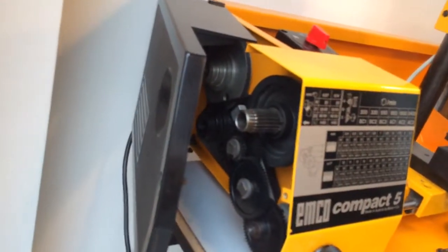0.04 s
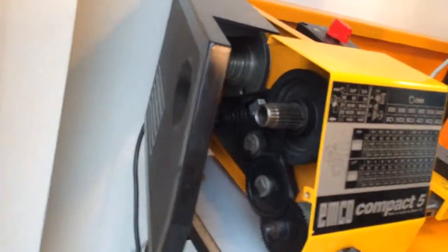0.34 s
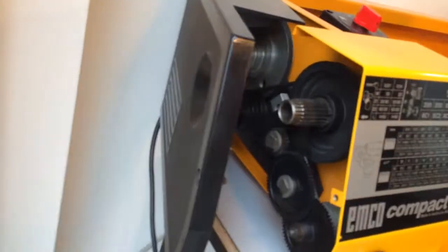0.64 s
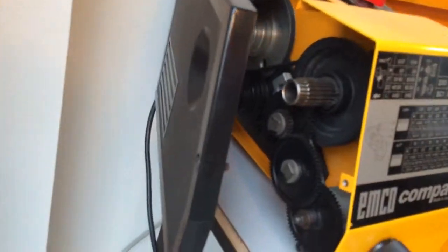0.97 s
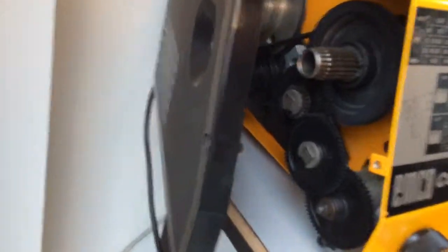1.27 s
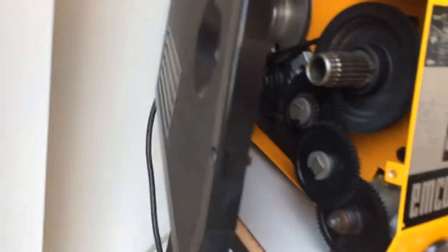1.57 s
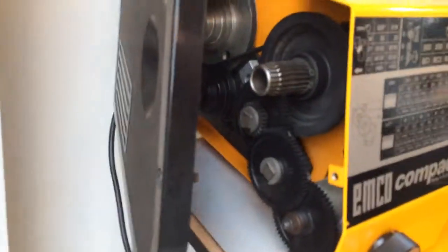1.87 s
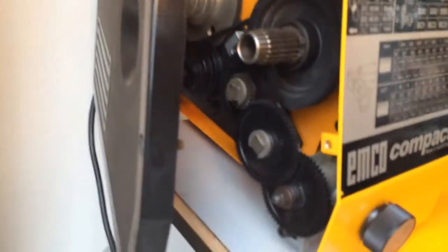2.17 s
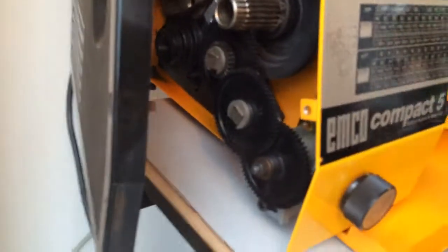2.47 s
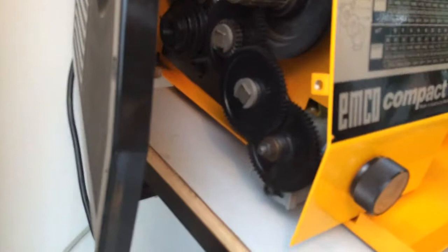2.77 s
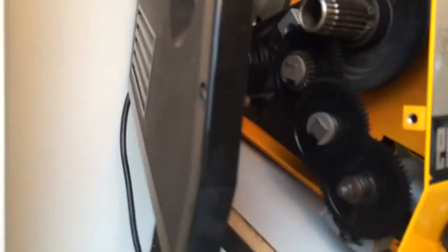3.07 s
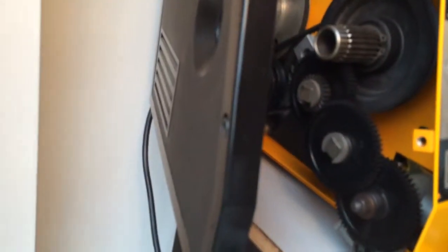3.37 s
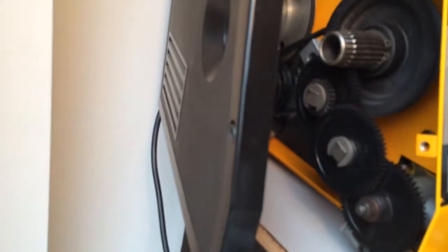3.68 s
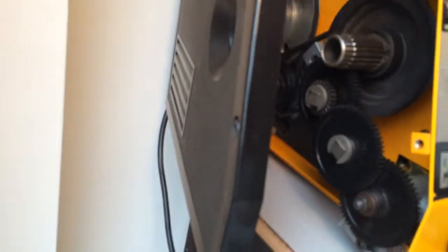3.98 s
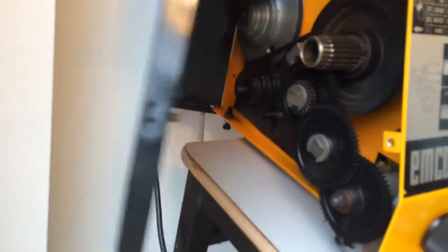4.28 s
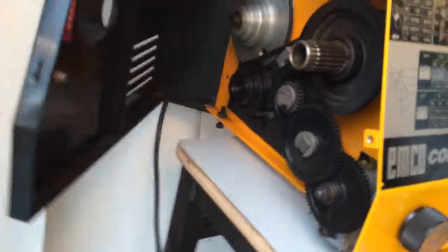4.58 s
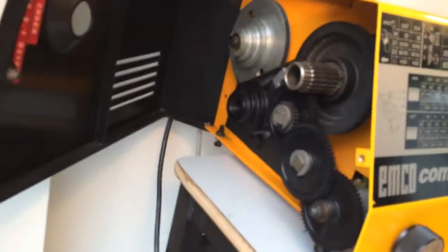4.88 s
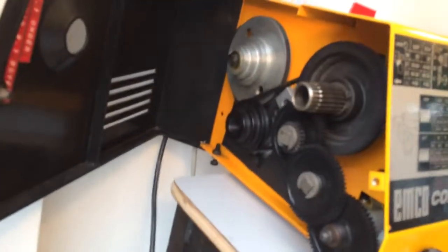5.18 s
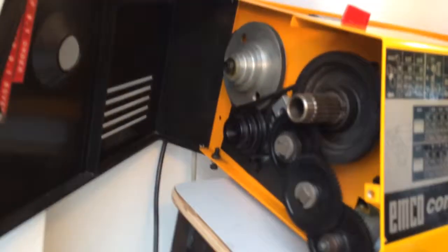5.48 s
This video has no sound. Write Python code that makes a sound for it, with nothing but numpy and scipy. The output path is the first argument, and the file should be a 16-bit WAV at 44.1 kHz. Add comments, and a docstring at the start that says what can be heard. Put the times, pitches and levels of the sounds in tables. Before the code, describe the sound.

The sheet-metal cover of a small lathe is handled close by in a quiet workshop. Fingers faintly brush the panel, then its steel catch snaps with loud, bright clicks at about 0.4 and 0.6 seconds. A few faint ticks follow. Dull, hollow knocks make the panel boom at about 1.9 and 2.3 seconds, and at 2.6 seconds comes a loud, quick clatter of knocks with another click. A soft double bump and a light brush follow just after 3 seconds. From about 4.2 seconds the cover swings open, its dry hinge scraping quietly in short, squeaky slips among small ticks. There is a soft knock at 4.8 seconds, one longer swelling drag near 5 seconds, then a few tiny slips and a last faint brush. Throughout, the small room adds a brief echo over a faint low rumble.

```python
"""The hinged sheet-metal cover of a small lathe is handled in a quiet workshop.
First, fingers brush the panel and the catch snaps, steel on steel, with bright clicks.
Around two seconds in, dull knocks make the panel boom, and the catch clicks again.
After four seconds the cover swings open: its dry hinge scrapes in short slips and one longer drag.
Last, fingers brush it once more. All along, the small room answers briefly over a low rumble."""
import sys
import numpy as np
from scipy import signal
from scipy.io import wavfile

SR = 44100
rng = np.random.default_rng(int(sys.argv[2]) if len(sys.argv) > 2 else 0)


def to_wav(sig):
    """Store sig (one row per channel, or 1-D mono) as 16-bit WAV at the path in sys.argv[1].

    Samples outside -1..1 are clipped; the rate is SR.
    """
    pcm = np.clip(np.atleast_2d(sig), -1, 1) * 32767
    pcm = np.round(pcm).astype(np.int16)
    wavfile.write(sys.argv[1], SR, pcm.T)  # frames by channels


N = 248524


def amp(db):
    """Turns decibels (dB) into a number to multiply by."""
    return 10 ** (np.asarray(db) / 20)


def unit(x):
    """Scales a sound to a total energy of 1."""
    return x / np.sqrt(np.sum(x ** 2) + 1e-20)


def look_up(points, hz):
    """Reads between a table's rows, on a log scale of frequency."""
    row_hz, value = np.transpose(points)
    return np.interp(np.log(hz + 1), np.log(row_hz), value)


def add(mix, start, sound):
    """Mixes a sound in at a start time in seconds."""
    part = mix[max(round(start * SR), 0):][:len(sound)]
    part += sound[:len(part)]


def seconds():
    """The sample times of one half-second event."""
    return np.arange(SR // 2) / SR


def coloured(x, points, size=4096):
    """Gives a sound the tone colour (strong and weak frequencies) of a table."""
    log_gain = np.log(amp(look_up(points, abs(np.fft.fftfreq(size, 1 / SR)))))
    taps = np.fft.ifft(np.exp(np.conj(signal.hilbert(log_gain)))).real  # never rings ahead of a hit
    return signal.fftconvolve(x, unit(taps[:size // 2]))[:len(x)]


def cut(x, hz, kind="low", order=2):
    """Keeps what is below hz ("low") or above it ("high")."""
    return signal.sosfilt(signal.butter(order, min(hz, .45 * SR), kind, fs=SR, output="sos"), x)


def fade(t, t60):
    """Dies away by 60 dB in t60 seconds, the fade time."""
    return np.exp(-np.log(1000) * t / t60)


def ring(tones):
    """Metal rings with several fading tones; neighbours start in opposite directions."""
    t = seconds()
    return unit(sum((-1) ** k * amp(db) * fade(t, t60) * np.sin(2 * np.pi * hz * t)
                    for k, (hz, db, t60) in enumerate(tones)))


def swelling_tone(hz, swell_s, t60):
    """One vibration that builds up, then dies away."""
    t = seconds()
    return unit(np.sin(2 * np.pi * hz * t) * (1 - fade(t, swell_s)) * fade(t, t60))


def blow(colour, t60, crack_db):
    """A hit: one crack, then so many fading tones that they blur into noise."""
    t = seconds()
    wash = unit(rng.standard_normal(len(t)) * fade(t, t60))
    wash[0] += amp(crack_db)
    return unit(coloured(wash, colour))


def friction(loudness, grain_db=4):
    """Rubbing is a stream of tiny slips of uneven size."""
    size, spread = rng.standard_normal((2, len(loudness)))
    return loudness * unit(size * amp(grain_db * spread)) * np.sqrt(len(loudness))


# Tone colours of the room noise and the rumble. Each row: frequency in Hz, relative level in dB.
AIR_COLOUR = [(12, -39.5), (20, -11.5), (38, -3.5), (90, -3), (140, -12), (465, -21), (534, -27),
              (705, -21), (834, -28), (906, -25.5), (1410, -30.5), (2150, -31.5), (3000, -36.5),
              (13100, -45.5), (15500, -47)]
RUMBLE_COLOUR = [(25, -20), (70, -4.5), (160, 0), (300, -12.5), (700, -19.5), (2000, -44), (8000, -64)]
# The rumble over time. Each row: time in seconds, relative level in dB, that of its deep part in dB.
RUMBLE_LEVELS = [(0.0, -59.5, -68), (0.38, -62, -69.5), (1.18, -64.5, -70), (1.96, -59.5, -60.5),
                 (2.46, -62, -72.5), (4.03, -67.5, -64.5), (4.74, -62, -81), (4.96, -56, -77),
                 (5.64, -62, -67)]

def background():
    """Steady room noise and the low rumble of a moving hand."""
    air, hand, sway = rng.standard_normal((3, N))
    times, *levels = np.transpose(RUMBLE_LEVELS)
    rumble_gain, deep_gain = (amp(np.interp(np.arange(N) / SR, times, db)) for db in levels)
    room = cut(coloured(air, AIR_COLOUR), 33, "high")
    rumble = rumble_gain * coloured(hand, RUMBLE_COLOUR)
    sway = cut(cut(sway, 54, order=4), 36, "high", order=4)
    deep = deep_gain * unit(sway) * np.sqrt(N)
    return amp(-60) * room + amp(-3) * rumble + amp(4) * deep


# How long the room rings. Each row: frequency in Hz, fade time in seconds.
ROOM_FADES = [(150, 0.51), (700, 0.29), (2000, .29), (5000, 0.25), (10000, 0.25), (15000, 0.2)]

def echoes(size=256):
    """Crowded echoes build up quickly; low ones last longer than high ones."""
    hz, t, bands = signal.stft(rng.standard_normal(SR // 2), SR, nperseg=size)
    bands = bands * fade(t, look_up(ROOM_FADES, hz)[:, None])
    tail = signal.istft(bands, SR, nperseg=size)[1][:SR // 2]
    return unit(tail * (1 - fade(seconds(), 0.0056)))


def workshop(x, count=4, shimmer_hz=28.13):
    """Several sets of echoes take the sound in turn, which keeps the tail blurred."""
    turn = shimmer_hz * np.arange(N) / SR
    feeds = (np.sqrt(2 / count) * np.cos(np.pi * (2 * turn + k / count)) for k in range(count))
    return sum(signal.fftconvolve(x * feed, echoes())[:N] for feed in feeds)


# The cover's tones. Each row: pitch in Hz, relative level in dB, fade time in seconds.
COVER_TONES = [(282, -15.5, 0.18), (290, -12, .16), (367.8, -9.5, .2), (404, -22.5, .14), (610, -1, 0.12),
               (642, -6.5, 0.055), (784.7, -2, .14), (838, -7, 0.21), (897, -5, .12), (990, -6.5, 0.082),
               (1116, -5.5, 0.031), (1208, -3.5, 0.072), (1444, -5.5, 0.042), (1513, -7.5, 0.084),
               (1670, -8.5, 0.065), (1836, -11, 0.19), (2250, -15.5, 0.034), (2564, -6.5, 0.19),
               (3030, -2, 0.11), (3190, 2, .07), (3250, -7.5, 0.026)]

def cover_ring():
    """The sheet metal rings briefly when touched."""
    return ring(COVER_TONES)


# The cover's hollow tones. Each row: pitch in Hz, relative level in dB, fade time in seconds.
HOLLOW_TONES = [(726, -15, .6), (810, -4, 0.4), (860, 7.5, 0.4), (910, -2.5, 0.18), (1235, 4.5, 0.22)]

def hollow_ring():
    """The cover rings on after it is rubbed."""
    return ring(HOLLOW_TONES)


# Tone colour of the hiss. Each row: frequency in Hz, relative level in dB.
HISS_COLOUR = [(300, -27), (2500, -2), (4200, -1.5), (8000, -0.5), (12000, -5), (15500, -6)]

def hiss(rub):
    """The fine, bright part of a rubbing sound."""
    return coloured(rub, HISS_COLOUR)


# Finger strokes. Each row: start in seconds, length in seconds, hiss level in dB, panel level in dB.
BRUSHES = [(0.019, 0.32, -70, -72), (0.353, 0.3, -68.5, -60), (3.126, 0.14, -76.5, -65),
           (3.261, 0.13, -73, -90.5), (5.151, 0.54, -91, -67.5)]

def fingers(swell_share=.27):
    """Skin slides on paint: a fine hiss and a dull murmur of the panel."""
    out = np.zeros(N)
    panel = unit(cover_ring() + amp(-4) * hollow_ring())
    for start, length, hiss_db, panel_db in BRUSHES:
        stroke = np.interp(seconds() / length, [0, swell_share, 1], [0, 1, 0])
        rub = friction(stroke)
        murmur = cut(signal.fftconvolve(rub, panel)[:len(rub)], 1300)
        add(out, start, amp(hiss_db) * hiss(rub) + amp(panel_db) * murmur)
    return out


# Tones of the hinge side. Each row: pitch in Hz, relative level in dB, fade time in seconds.
HINGE_TONES = [(595, -3.5, 0.07), (720, -1.5, 0.078), (876, -3, 0.095), (1181, -3.5, 0.041),
               (1238, 8, 0.035), (1620, -6, 0.22), (1773, -3.5, 0.054), (2150, 5.5, 0.025),
               (2270, -1, 0.067), (2299, 6.5, 0.05), (2890, 8, 0.015), (2900, -20, 0.042),
               (3134, 2.5, 0.014), (3280, 0, 0.037), (3780, -1, 0.026), (4250, -2.5, 0.029),
               (4780, 0, 0.016), (4970, 5, 0.019)]
# Tone colour of the hinge's rasp. Each row: frequency in Hz, relative level in dB.
RASP_COLOUR = [(100, -21), (400, -13), (750, 6), (1250, -3.5), (1750, -2), (2250, 6), (2650, 0.5),
               (4400, 2), (5600, -4), (15000, -60)]

def scrape(loudness, top_hz, squeak_hz, squeak_cycles=11):
    """Rubbing makes the hinge side ring, while the contact itself squeaks, rasps and hisses."""
    t = seconds()
    detune = 1 + 0.0039 * rng.standard_normal(len(HINGE_TONES))  # pressure differs for each scrape
    tones = [(hz * shift, db, t60) for (hz, db, t60), shift in zip(HINGE_TONES, detune)]
    body = ring(tones) + amp(-12.5) * hollow_ring()
    contact = ring([(squeak_hz, 0, squeak_cycles / squeak_hz)])
    drag, chatter, rasp = (friction(loudness) for _ in range(3))
    ringing = signal.fftconvolve(drag, body)[:len(t)]
    squeak = signal.fftconvolve(chatter, contact)[:len(t)]
    rub = ringing + amp(-0.5) * squeak + amp(-4.5) * coloured(rasp, RASP_COLOUR)
    hiss_db = -17 + 10.5 * np.log2(top_hz / 6140)  # a brighter slip hisses more
    return amp(-7.5) * cut(rub, top_hz) + amp(hiss_db) * hiss(rasp)


# Short slips of the hinge. Each row: start in seconds, length in seconds, relative level in dB,
# treble limit in Hz, squeak pitch in Hz.
SLIPS = [(4.2218, 0.019, -46.5, 5230, 2300), (4.245, 0.028, -45.5, 6340, 4140),
         (4.2897, 0.013, -36.5, 2900, 2190), (4.346, 0.011, -47.5, 2480, 1800),
         (4.372, 0.014, -45, 2120, 1330), (4.458, 0.044, -61.5, 5200, 4580),
         (4.799, 0.031, -61, 4600, 3870), (5.024, 0.0091, -57, 4000, 3000), (5.114, .006, -61, 3450, 2900),
         (5.1708, 0.011, -53, 4300, 870)]
# The long drag as the cover swings wide. Each row: time in seconds, relative level in dB.
DRAG_LEVELS = [(4.84, -75), (4.925, -57), (4.95, -48.5), (4.979, -40), (5.005, -86), (5.06, -78)]

def hinge(rise_s=0.0028, fall_s=0.0057):
    """The dry hinge breaks loose in short slips and one long, swelling drag."""
    out, t = np.zeros(N), seconds()
    for start, length, db, top_hz, squeak_hz in SLIPS:
        slip = np.clip(np.minimum(t / rise_s, 1 + (length - t) / fall_s), 0, 1)
        add(out, start, scrape(amp(db) * slip, top_hz, squeak_hz))
    times, levels = np.transpose(DRAG_LEVELS)
    now = times[0] + t
    drag = amp(np.interp(now, times, levels)) * (now < times[-1])
    add(out, times[0], scrape(drag, top_hz=5300, squeak_hz=1280))
    return out


# Tone colour of the struck cover. Each row: frequency in Hz, relative level in dB.
COVER_COLOUR = [(30, -3.5), (90, -1), (200, 2.5), (450, -2.5), (850, -1), (1400, -8.5), (2000, -7),
                (2600, -11), (5500, -18), (8500, -26.5), (15000, -21.5)]

def panel_hit(t60, crack_db, ring_db):
    """Struck sheet metal gives a burst of noise and rings."""
    return blow(COVER_COLOUR, t60, crack_db) + amp(ring_db) * cover_ring()


# Low tones of the whole cover bending. Each row: pitch in Hz, relative level in dB, fade time in seconds.
FLEX_TONES = [(104, 1.5, .38), (185.1, -4, 0.23), (324, 3, .14), (417, 0, 0.02)]
# Knocks on the panel. Each row: start in seconds, level in dB, treble limit in Hz, boom pitch in Hz,
# the boom's share in dB, clack pitch in Hz.
KNOCKS = [(0.3826, -31.5, 1500, 150, -4, 616), (0.412, -35, 920, 161, -6, 620),
          (1.855, -17.5, 1708, 224.4, 1.5, 680), (2.258, -15.5, 1340, 160, 1.5, 558),
          (2.6355, -3.5, 6970, 156, 2, 803), (2.641, -5.5, 2640, 155.5, -13, 1085),
          (2.669, -13.5, 1800, 155, -6, 402), (2.7001, -15.5, 2280, 150, -9, 846),
          (3.133, -32, 1300, 156.7, -5, 785), (3.157, -36.5, 1170, 151.4, 0, 768),
          (4.815, -34, 1515, 174.6, 4.5, 800)]

def knocks(boom_cycles=43):
    """The struck spot clacks, then the whole panel booms; a softer contact gives less treble."""
    out, flex = np.zeros(N), ring(FLEX_TONES)
    for start, db, top_hz, boom_hz, boom_db, clack_hz in KNOCKS:
        panel = cut(panel_hit(t60=0.098, crack_db=-7, ring_db=-18.5), top_hz, order=4)
        boom = swelling_tone(boom_hz, swell_s=0.051, t60=boom_cycles / boom_hz)
        clack = swelling_tone(clack_hz, swell_s=.0087, t60=.021)
        knock = panel + amp(boom_db) * boom + amp(-5.5) * clack + amp(-6) * flex
        add(out, start, amp(db) * knock)
    return out


# The steel catch's tones. Each row: pitch in Hz, relative level in dB, fade time in seconds.
CATCH_TONES = [(3520, 3, 0.11), (3664, -2, .2), (5070, -3, .18), (4932, -1, .17), (5110, 4, 0.2),
               (5200, -5, .18), (5630, -1.5, 0.11), (5740, -5.5, 0.12), (6117, -3, 0.24), (6456, -3, .16),
               (6638, -8, 0.19), (6600, -5, 0.22), (7410, -2, 0.13)]
# Tone colour of its snap. Each row: frequency in Hz, relative level in dB.
CATCH_COLOUR = [(100, -36), (400, -13.5), (1200, -21.5), (2300, -12), (3100, -4), (3800, 2), (6500, 1),
                (8000, -2), (10500, -3.5), (15500, -10.5)]

def click(db, cover_db):
    """Steel snaps on steel; the stiff edge passes only the higher tones on to the cover."""
    top_hz = 13000 * 2 ** (db / 75 - cover_db / 46)  # brighter if hit harder or the cover gives less
    contact = blow(CATCH_COLOUR, t60=.05, crack_db=-9)
    snap = cut(contact + amp(-20) * ring(CATCH_TONES), top_hz, order=3)
    panel = cut(panel_hit(t60=.07, crack_db=-15.5, ring_db=-2.5), 480, "high", order=4)
    return amp(db) * (snap + amp(cover_db) * panel)


# Clicks of the catch. Each row: start in seconds, level in dB, the cover's share in dB.
CLICKS = [(.1013, -35, -19), (.431, -5, -18), (0.5501, -22.5, -11), (.591, -31, -2.5), (.6263, -3.5, -10.5),
          (.638, 2.5, -5), (.863, -40.5, 0.5), (1.271, -51.5, 7), (1.7839, -40, -6), (2.1258, -32.5, -17.5),
          (2.2411, -33.5, -19.5), (2.492, -46.5, 5.5), (2.635, -13, -3), (2.6985, -25.5, -17),
          (4.3398, -36, -10.5), (4.481, -40.5, -43)]

def catch(ticks_per_s=1.5, tick_range_db=7):
    """The catch clicks as it is worked and, being loose, ticks faintly at random."""
    out = np.zeros(N)
    for start, db, cover_db in CLICKS:
        add(out, start, click(db, cover_db))
    chance, softness = rng.random((2, N))
    ticks = (chance < ticks_per_s / SR) * amp(-tick_range_db * softness)
    return out + signal.oaconvolve(ticks, click(db=-45, cover_db=-4))[:N]


def scene():
    """Mixes the cover's sounds, their echoes and the background into one channel."""
    near = catch() + knocks() + hinge() + fingers()
    echo = workshop(cut(near, 250, "high"))
    return (amp(3.5) * near + amp(-7) * echo + background())[None]


def record(dry):
    """Takes away the deepest bass and the highest treble."""
    thinned = cut(dry, 37, "high", order=6)
    treble_cut = signal.firwin(511, 15650, window=("kaiser", 8), fs=SR)
    return signal.oaconvolve(thinned, treble_cut[None], "same")


dry = scene()
out = record(dry)
to_wav(out)
```